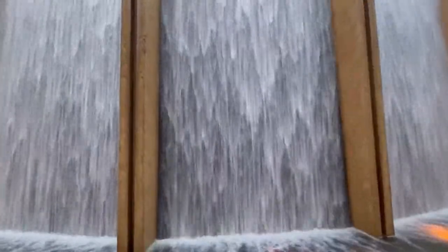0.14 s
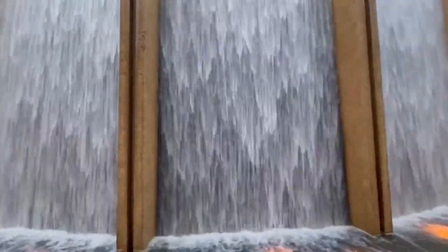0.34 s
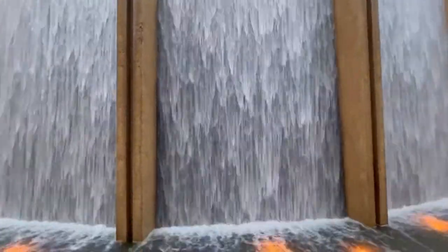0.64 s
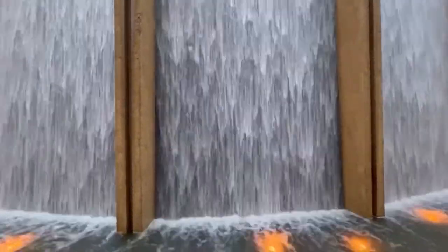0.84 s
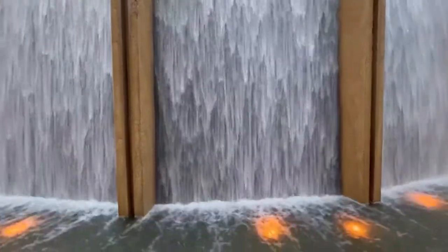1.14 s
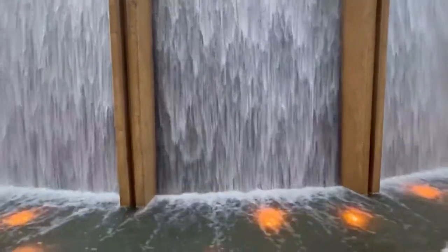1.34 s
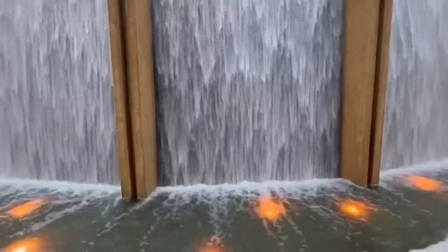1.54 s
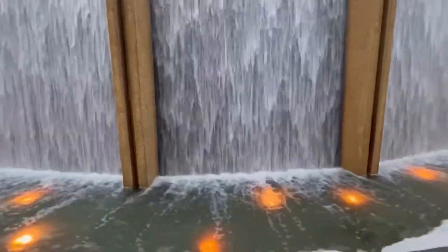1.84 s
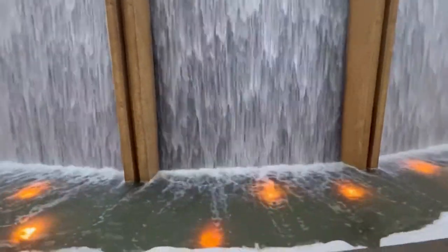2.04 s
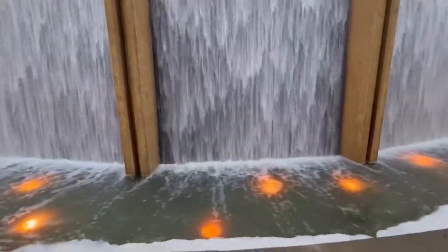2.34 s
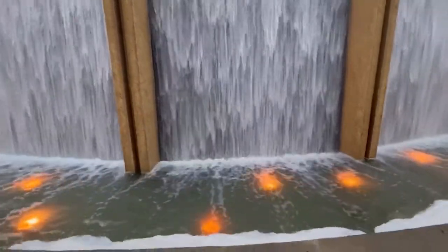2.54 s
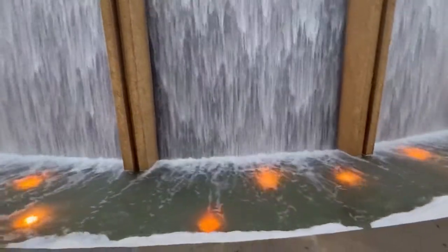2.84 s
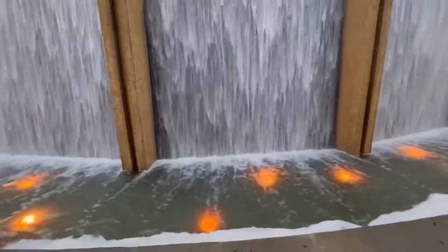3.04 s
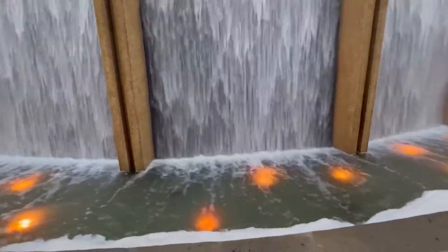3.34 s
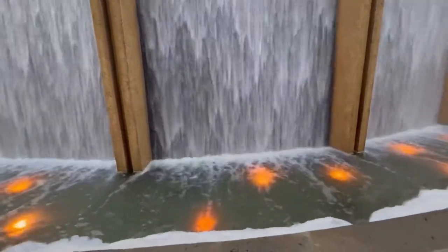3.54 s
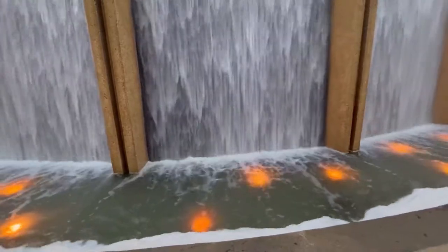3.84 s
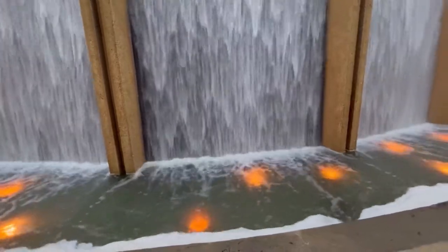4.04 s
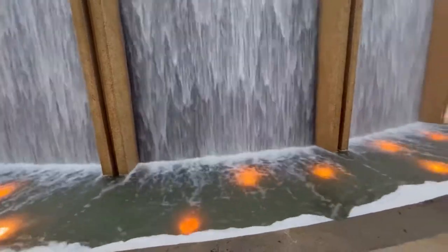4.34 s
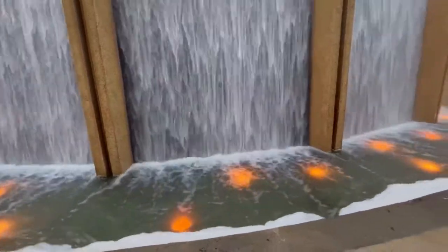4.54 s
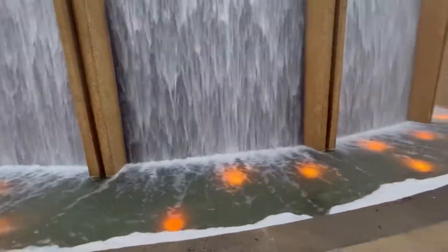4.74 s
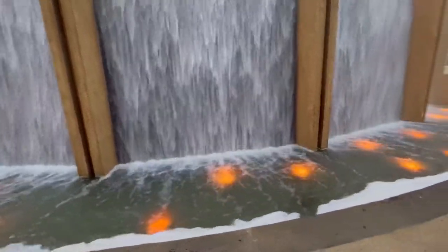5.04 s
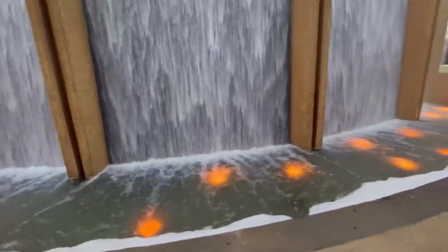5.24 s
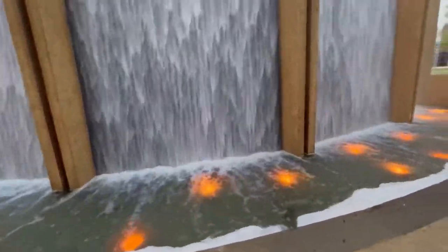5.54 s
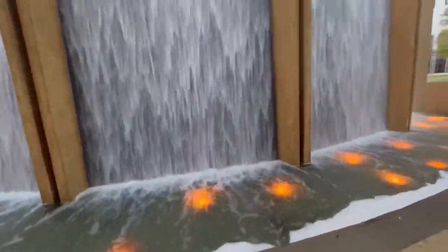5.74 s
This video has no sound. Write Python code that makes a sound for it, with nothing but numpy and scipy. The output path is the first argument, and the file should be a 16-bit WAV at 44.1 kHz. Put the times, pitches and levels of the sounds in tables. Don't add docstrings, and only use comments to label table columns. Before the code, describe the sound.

From 0 to about 5.9 seconds, a wide, dense roar of water runs down a tall wall and crashes into a shallow basin close by. It is smooth and nearly constant, with fine rapid splash flicker in the middle, airy hiss above and faint ringing bubbles blended in. As the small stereo microphone turns off the fall over the first two seconds, the left side's brightness eases slightly, returning a little near the end. Below lies soft city rumble, its road noise fading early, and a wavering deep pump drone. A low, almost pure engine hum draws near at once, dips briefly around 0.6 and 1.0, is loudest near 1.7, rises slightly in pitch and is gone by 3.1. The rumble lurches between 2.9 and 3.5, then swells gently around 4. Two very short, low wind thumps hit mainly the left at 4.3 and 4.4. Water continues to the cut.

```python
import sys
import numpy as np
from scipy import signal
from scipy.fft import rfft, irfft, next_fast_len
from scipy.io import wavfile

SR = 44100
rng = np.random.default_rng(int(sys.argv[2]) if len(sys.argv) > 2 else 0)


def output_pcm(signal):
    pcm = np.clip(np.atleast_2d(signal).T, -1, 1) * 32767
    wavfile.write(sys.argv[1], SR, np.round(pcm).astype(np.int16))


def ratio(d):
    e = np.asarray(d, float) / 20
    return 10 ** e


N = 259749
T = np.arange(N) / SR
SIZE = next_fast_len(N)
HZ = np.maximum(np.arange(SIZE // 2 + 1) * SR / SIZE, 1)

# (time [s], level [dB])
FACING = [
    (0, 3),
    (1, 2),
    (2, -.4),
    (3, -0.5),
    (5.4, -0.34),
    (5.89, 0.9),
]
ROAR_FOLLOWS = 0.28

TOP_SHARE = 1 / (1 + np.exp(np.clip((9760 - HZ) / 250, -50, 50)))


def in_time(rows):
    s, *columns = np.transpose(rows)
    return [np.interp(T, s, c) for c in columns]


def at_hz(points):
    hz, *columns = np.transpose(points)
    return [np.interp(np.log(HZ), np.log(hz), c) for c in columns]


def rms_one(x):
    return x / np.sqrt(np.mean(x ** 2))


def bumps(s, half_s, db):
    return sum(d * np.exp(-((T - at) / h) ** 2) for at, h, d in np.broadcast(s, half_s, db))


def drift(rate):
    r = np.exp(-80 * np.pi * rate / SR)
    slow = signal.lfilter([1], [1, -2 * r, r * r], rng.standard_normal(N // 40 + 2002))[2000:]
    return np.interp(np.arange(N) / 40, np.arange(len(slow)), rms_one(slow))


def stereo_white():
    # (frequency [Hz], in step [share], left late [share], left early [share])
    likeness = [(40, 0.975, 0., 0.0081), (120, 0.9, 0.011, 0.011), (250, 0.83, 0.0074, 0.),
                (446, 0.0046, 0.061, 0.032), (690, 0.41, 0, .0), (884, -0.48, 0.16, 0.061),
                (1084, 0.35, 0.077, 0.054), (1400, -0.11, 0.13, 0.074), (2540, 0.042, 0.11, 0.12),
                (6000, -0.0097, 0.13, 0.053), (9000, 0.02, 0.13, .0)]
    in_step, late, early = at_hz(likeness)
    port_gap_s = 0.00042
    turn = np.exp(2j * np.pi * HZ * port_gap_s)
    wide = in_step + late * turn + early / turn
    top = np.exp(2j * np.pi * (HZ - 11970) / 3580)
    alike = wide + TOP_SHARE * (top - wide)
    one, other = rfft(rng.standard_normal((2, SIZE)) * np.sqrt(SR / 2))
    unlike = np.sqrt(np.clip(1 - abs(alike) ** 2, 0, 1))
    return np.array([one, alike * one + unlike * other])


def roar(surge_db, flicker_db, spray_db):
    # (frequency [Hz], density [dB per Hz])
    left_roar = [(250, -59.5), (430, -64), (650, -58), (800, -57), (930, -61), (1250, -56), (2200, -61),
                 (2900, -61.5), (3300, -64), (3900, -64), (5800, -58.5), (8000, -58), (10000, -67)]
    # (frequency [Hz], density [dB per Hz])
    right_roar = [(250, -60), (430, -64), (600, -57.5), (850, -63), (1100, -58.5), (2000, -61), (3200, -64),
                  (5000, -72), (7500, -69.5), (9300, -65), (10400, -65.5), (11500, -66), (13100, -71),
                  (15300, -66.5)]
    left_port_hz, right_port_hz = 6100, 9150
    left_db, = in_time(FACING)
    roar_db, right_db = ROAR_FOLLOWS * left_db, 1.8 * left_db

    left, right = at_hz(left_roar)[0], at_hz(right_roar)[0]
    colour = ratio(np.array([left + TOP_SHARE ** 4 * (right - left), right]))
    sound = stereo_white() * colour / np.sqrt(1 + (230 / HZ) ** 6)
    centres = np.geomspace(200, 16000, 22)
    place = np.interp(np.log(HZ), np.log(centres), np.arange(len(centres)))

    out, surge, spray = 0, drift(2.6), drift(25.0)
    for k, hz in enumerate(centres):
        band = irfft(sound * np.clip(1 - abs(place - k), 0, 1), SIZE)[:, :N]
        near_left = np.exp(-(np.log(hz / left_port_hz) / 0.25) ** 2)
        near_right = np.exp(-(np.log(hz / right_port_hz) / 0.11) ** 2)
        dull = 1 / (1 + (hz / 5000) ** 4)
        splashy = 0.34 + 0.89 * np.exp(-np.log(hz / 1600) ** 2)
        facing_db = roar_db * dull + np.array([near_left * left_db, near_right * right_db])
        patches_db = surge_db * surge + flicker_db * splashy * drift(17.0) + spray_db * (1 - dull) * spray
        out = out + band * ratio(facing_db + patches_db)
    return out


def bubbles(level_db, per_s, cycles):
    sizes = ratio(2.9 * np.minimum(rng.exponential(1, (2, N)), 5)) * rng.choice([-1, 1], (2, N))
    clicks = sizes * (rng.random((2, N)) < per_s / SR) + 1e-18
    pitches = np.geomspace(850, 3600, 14)
    dealt = rng.integers(0, 14, (2, N))
    out = 0
    for k, hz in enumerate(pitches):
        r, w = ratio(-60 * hz / (cycles * SR)), 2 * np.pi * hz / SR
        ring = signal.lfilter([0, np.sin(w)], [1, -2 * r * np.cos(w), r * r], clicks * (dealt == k))
        out = out + ring
    return ratio(level_db + ROAR_FOLLOWS * in_time(FACING)[0]) * rms_one(out)


def rumble():
    # (frequency [Hz], density [dB per Hz])
    rumble_colour = [(22, -81), (35, -69), (55, -47.5), (75, -49), (90, -50.5), (120, -52.5), (170, -55.5),
                     (250, -58.5)]
    # (time [s], half length [s], level [dB])
    traffic = [(.09, 0.042, -1), (2.92, 0.054, 4), (3.094, .05, -9), (3.215, 0.055, 7), (3.43, .07, -4),
               (3.6, .06, 0.5), (4.05, 0.3, 3.5), (4.8, 0.098, 3), (5.1, 0.036, -1), (5.267, 0.1, 1.5),
               (5.88, .06, -4)]
    pump_hz, pump_db = 74.5, -36.5
    sound = stereo_white() * ratio(at_hz(rumble_colour)[0]) / np.sqrt(1 + (HZ / 230) ** 6)
    swell_db = bumps(*np.transpose(traffic))
    deep = 1 / (1 + (HZ / 95) ** 6)
    low = irfft(sound * deep, SIZE)[:, :N]
    upper = irfft(sound * (1 - deep), SIZE)[:, :N]

    pump = np.sqrt(2) * np.sin(2 * np.pi * np.cumsum(pump_hz + 1.15 * drift(2.6)) / SR)
    low = low * ratio(-2.5) + pump * ratio(pump_db + 1.0 * drift(4.1))
    receding_db = 3 * np.exp(-T / 0.61)
    upper_db = 0.28 * swell_db - 0.4 + receding_db
    return low * ratio(swell_db) + upper * ratio(upper_db)


def engine():
    # (time [s], level [dB])
    passing = [
        (0, -35),
        (.14, -23.5),
        (.7, -23),
        (1.68, -19),
        (1.9, -23),
        (2.26, -24),
        (2.36, -31.5),
        (2.97, -28.5),
        (3.15, -41),
    ]
    # (time [s], level [dB])
    shadows = [
        (.57, -5),
        (1.02, -6),
        (2.55, -1),
    ]
    idle_hz, pull_away_s, rise_hz_per_s = 97.85, 0.698, 3.0
    hz = idle_hz + rise_hz_per_s * np.maximum(T - pull_away_s, 0)
    shadow_s, shadow_db = np.transpose(shadows)
    level_db = in_time(passing)[0] + bumps(shadow_s, 0.051, shadow_db)
    gone = np.clip((passing[-1][0] - T) / 0.1, 0, 1)

    turns = np.cumsum(hz + 0.31 * drift(5.3)) / SR
    phase = 2 * np.pi * turns + np.array([np.zeros(N), 0.14 + 0.071 * drift(2.7)])
    tone = np.sqrt(2) * (np.sin(phase) + ratio(-23.5) * np.sin(2 * phase))
    sides = ratio(np.array([[-0.45], [0.45]]))
    return ratio(level_db + 0.5 * drift(12.0)) * gone * tone * sides


def gust():
    # (time [s], level [dB])
    puffs = [
        (4.29, -19),
        (4.40, -20),
    ]
    rise_db_per_s, fall_db_per_s = 300, 250
    band = signal.butter(2, [40, 160], "band", fs=SR, output="sos")
    left, right = signal.sosfilt(band, rng.standard_normal((2, N)))
    slopes = [db - np.maximum(rise_db_per_s * (s - T), fall_db_per_s * (T - s)) for s, db in puffs]
    push = rms_one(left)
    pull = ratio(-14.0) * rms_one(right) - 0.35 * push
    return np.array([push, pull]) * ratio(np.max(slopes, axis=0))


def scene():
    water = roar(surge_db=0.07, flicker_db=1.13, spray_db=0.5)
    water = water + bubbles(level_db=-37.5, per_s=250, cycles=28.0)
    return water + rumble() + engine() + gust()


def top_cut(x):
    return signal.sosfilt(signal.butter(12, 15740, fs=SR, output="sos"), x)


def record(dry):
    return top_cut(dry)


dry = scene()
out = record(dry)
output_pcm(out)
```